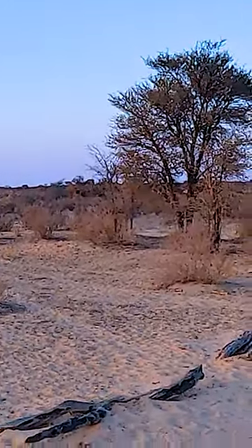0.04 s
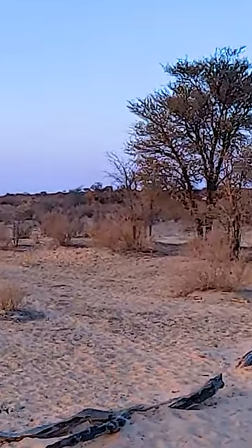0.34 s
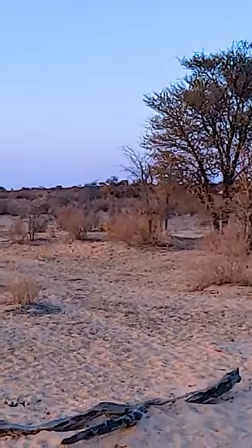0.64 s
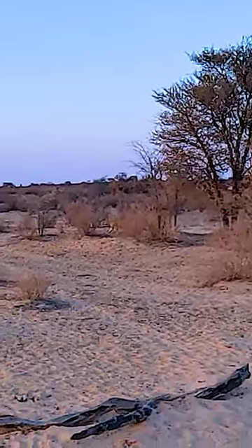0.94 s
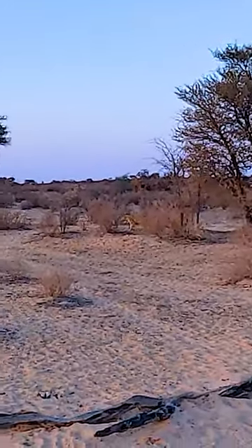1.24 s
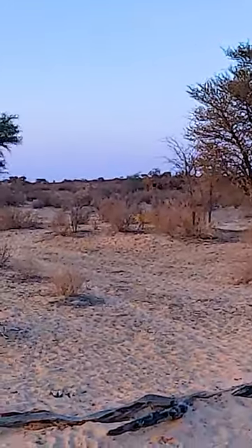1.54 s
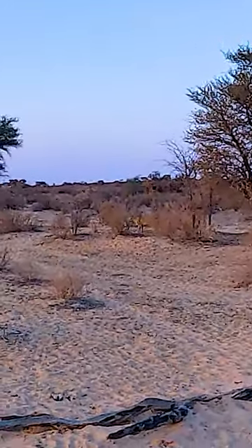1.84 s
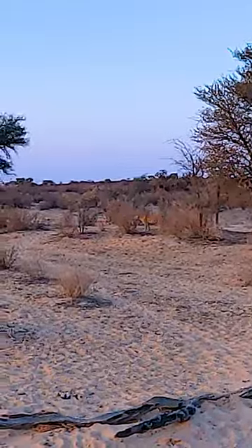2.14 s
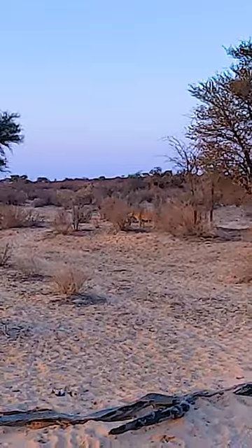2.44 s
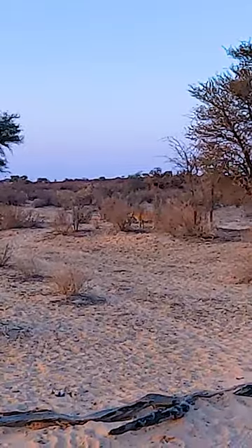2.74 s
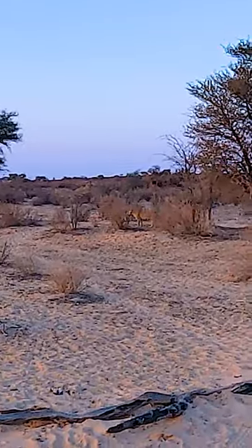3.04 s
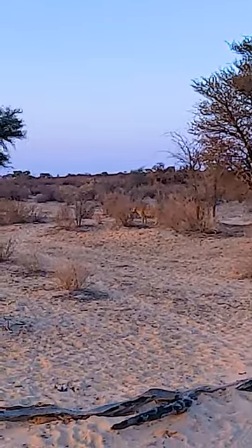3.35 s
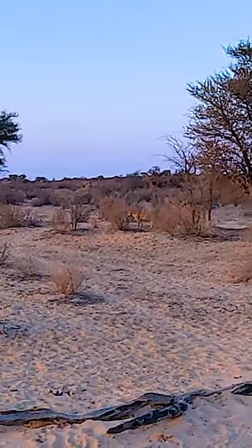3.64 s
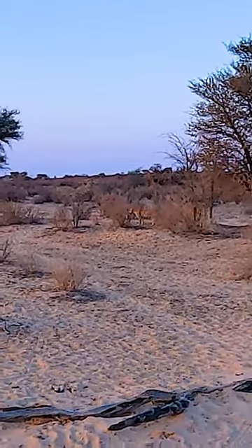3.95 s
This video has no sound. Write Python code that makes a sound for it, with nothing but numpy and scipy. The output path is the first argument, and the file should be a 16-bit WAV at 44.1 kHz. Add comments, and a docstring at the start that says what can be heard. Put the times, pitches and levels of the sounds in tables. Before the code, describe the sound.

Hoarse, low sawing grunts from a leopard in dry scrub repeat about twice a second, alternating with rattling breaths in. A close dull knock opens, faint bird-like notes and soft hiss lie behind, and cloth rustles nearby toward the end.

```python
"""A leopard saws from dry scrub on open savanna: eight hoarse strokes with rattling in-breaths between.
Its slack vocal folds flap about 59 times a second going out and 30 coming in; the throat booms on the
fourth harmonic and air rasps through the mouth at each flap. Bushes scatter the sound. Close by are
rustles and one dull knock; behind them, faint bird-like calls and a low hiss."""
import sys
import numpy as np
from scipy import signal
from scipy.fft import rfft, irfft
from scipy.io import wavfile
from scipy.ndimage import uniform_filter1d

SR = 44100
rng = np.random.default_rng(int(sys.argv[2]) if len(sys.argv) > 2 else 0)


def persist_wave(psi):
    """Save psi, clipped to +-1, as 16-bit WAV."""
    counts = np.round(np.clip(psi, -1, 1) * 32767).astype(np.int16)
    wavfile.write(sys.argv[1], SR, np.atleast_2d(counts).T)


N = 176400
PUFF_S = .0043  # decay of the air burst after each flap


def out_strokes(t):
    """Each stroke catches and holds its pitch; most stop short, three sink and slow to separate flaps."""
    # full voice t/s, lead-in/s, hold/s, end t/s, flap rate/Hz, boom/dB, swell over hold/dB,
    # drop at break/dB, rasp/dB, mouth opening/0-1, fade/(dB/s)
    strokes = [(-.018, .02, 0.084, 0.091, 58.7, -13.5, -3.5, 6.5, -35, .38, 173),
               (0.529, 0.035, .083, 0.62, 60.3, -15, 5, 14.5, -33, 0.34, 174),
               (1.037, 0.015, 0.1, 1.207, 59.24, -15.5, 7.5, 11.5, -34.5, 0.41, 170),
               (1.568, 0.037, 0.09, 1.662, 60.8, -15, 0.5, 0.5, -34, 0.59, 188),
               (2.093, 0.033, .098, 2.19, 59.16, -13.5, 4, 2, -35, 0.64, 130),
               (2.626, 0.019, .127, 2.845, 57.76, -15.5, 2, 4.5, -34.5, 0.63, 128),
               (3.238, 0.029, 0.1, 3.41, 57.33, -16.5, 1, 4, -35, 0.69, 78),
               (3.856, 0.025, 0.089, 3.93, 59.54, -14, 2, -6.5, -30.5, 0.78, 94)]
    # throat resonances: f/Hz, width/Hz, level/dB
    throat_modes = [(121.2, 53, -9.5), (195, 75, 1), (290.3, 44, -5), (355.2, 37, -8)]
    # mouth resonances: f/Hz, width/Hz, nearly closed/dB, wide open/dB
    mouth_modes = [(411, 134, -6, -3.5), (580, 98, 9.5, -6), (866, 133, -12, 8.5), (1041, 98, -10.5, 4.5),
                   (1278, 160, -19.5, -5), (1562, 143, -15.5, 5), (1858, 74, -12, 4), (2126, 99, -4, -1),
                   (2405, 410, -5.5, -15), (3770, 390, -16, -21), (4800, 950, -18.5, -31)]
    boom_attack_db_per_s, rasp_attack_db_per_s, throat_fade_db_per_s = 397, 227.5, 128
    linger_s, throb_lag_cycles, puff_rise_s, leak = .44, .33, .0018, .21
    soft_folds = signal.butter(2, 1190, fs=SR, output="sos")
    out, waver = 0, 1 + .003 * walk(40)
    for at, lead, hold, end, flap_hz, boom_db, swell_db, drop_db, rasp_db, opening, fade in strokes:
        late = t - at - hold
        before, after = np.minimum(t - at, 0), np.maximum(late, 0)
        progress = np.clip((t - at) / hold, 0, 1)
        arch = .5 - (2 * progress - 1) ** 2
        flow = gate(t, at - lead, end)
        break_db = drop_db * step(late / .0018)
        slowed = step((late - .028) / .016)  # breath runs out in the long strokes
        slaps, puffs, cycles = flaps(flap_hz * waver * (1 - .5 * slowed), at, jitter=.006, scatter_db=1.4)

        sunk = step((late - .006) / .010)
        turns = np.cumsum(flap_hz * waver * (1 + .034 * arch) * (1 - .17 * sunk)) / SR
        turns -= np.interp(at + hold / 2, t, turns - cycles)  # in phase with the flaps at mid-hold
        throb = 1 + .72 * slowed * np.cos(2 * np.pi * (cycles - throb_lag_cycles))
        push_db = boom_attack_db_per_s * before + swell_db * (progress - .5) + .5 * arch
        tail_db = 1.04 * fade * after / (1 + after / linger_s)
        boom = np.sin(2 * np.pi * 4 * turns) * throb * flow * undb(boom_db + push_db - break_db - tail_db)

        effort = flow * undb(rasp_attack_db_per_s * before - .5 * break_db)
        throat = through(slaps * effort * undb(-31 - throat_fade_db_per_s * after), ring(throat_modes))

        puffs = uniform_filter1d(puffs, int(puff_rise_s * SR))
        air = (puffs * np.sqrt(2 / (PUFF_S * flap_hz)) + leak) * rng.standard_normal(N)
        air += .85 * signal.sosfilt(soft_folds, slaps)
        rasp = air * effort * undb(rasp_db + 1.5 * arch - fade * after)
        mouth = ring([(hz, width, shut + opening * (wide - shut)) for hz, width, shut, wide in mouth_modes])
        jaw = 1 - .03 * np.clip((t - at) / hold, 0, 2)  # closing lowers the resonances
        out = out + boom + throat + gliding(rasp, mouth, jaw)
    return out


def in_breaths(t):
    """Slow, uneven flaps knock the throat while air is drawn in."""
    # start t/s, peak t/s, end t/s, flap rate/Hz, rattle/dB, air/dB
    breaths = [(0.294, 0.381, 0.49, 29.26, -32, -46), (0.82, 0.927, 0.973, 30.02, -29.5, -49.5),
               (1.311, 1.436, 1.482, 29.65, -27.5, -48), (1.868, 1.948, 1.998, 32.36, -26, -45),
               (2.407, 2.484, 2.595, 32.94, -27, -47), (2.949, 3.09, 3.165, 31.5, -27, -46),
               (3.56, 3.705, 3.78, 29.82, -27.5, -41.5)]
    # throat resonances: f/Hz, width/Hz, level/dB
    throat_modes = [(109.5, 23, -10), (169.2, 32, 0), (197.3, 41.7, 2.5), (348.4, 32, -7.5)]
    # indrawn air spectrum: f/Hz, density/dB
    air_spectrum = [(250, -6.5), (450, -5.5), (680, -3), (930, -7), (1110, 0), (1300, -8.5), (1800, -7),
                    (2400, -8.5), (3100, -17.5), (3700, -11), (5600, -25), (8000, -42.5), (12000, -60)]
    edge_db, churn = -8.5, .5
    rattle, air = 0, 0
    for start, at, end, flap_hz, rattle_db, air_db in breaths:
        slaps, puffs, _ = flaps(np.full(N, flap_hz), at, jitter=.035, scatter_db=1.1)
        from_peak = (t - at) / np.where(t < at, at - start, end - at)
        effort = gate(t, start, end) * undb(edge_db * np.minimum(np.abs(from_peak), 2))
        rattle = rattle + (slaps + churn * puffs * rng.standard_normal(N)) * effort * undb(rattle_db)
        air = air + unit(puffs + .48) * effort ** .8 * undb(air_db)
    return gliding(rattle, ring(throat_modes), tuning=1 + .04 * walk(30)) + air * noise(air_spectrum)


def flaps(hz, at, jitter, scatter_db):
    """Vocal folds flapping, timed from `at`: slaps, the air bursts after them, cycle count."""
    cycles = np.cumsum(hz) / SR
    cycles -= np.interp(at, np.arange(N) / SR, cycles) + min(at, 0) * hz[0]
    onsets = np.flatnonzero(np.diff(np.floor(cycles)) > 0)
    chance = np.clip(rng.standard_normal((N // 400, 2))[:len(onsets)], -2, 2)
    onsets += (jitter * chance[:, 0] * SR / hz[onsets]).astype(int)
    slaps = np.zeros(N)
    slaps[np.clip(onsets, 0, N - 1)] = undb(scatter_db * chance[:, 1])
    puffs = signal.lfilter([1], [1, -np.exp(-1 / (PUFF_S * SR))], slaps)
    return slaps * np.sqrt(SR / hz.max()), puffs, cycles


def wheezes(t):
    """Brief whistles of air in the leopard's throat."""
    # whistles: t/s, half length/s, f/Hz, width/Hz, level/dB
    whistles = [(1.392, 0.0069, 1940, 590, -38.5), (1.61, 0.035, 863, 70.7, -33.5),
                (3.15, 0.031, 1926, 900, -38), (3.248, 0.0091, 2000, 239, -28),
                (3.363, 0.014, 989, 69, -33.5), (3.399, 0.028, 1915, 296, -37),
                (3.963, 0.048, 3950, 605, -43)]
    return notes(t, whistles)


def scrub(x):
    """Faint, dull scatter from bushes and ground."""
    t60_s, delay_s, band_hz = .27, .012, [300, 4070]
    t = np.arange(SR) / SR
    tail = rng.standard_normal(SR) * undb(-60 * t / t60_s) * (t > delay_s)
    tail /= np.sqrt(np.sum(tail ** 2))
    tail = signal.sosfilt(signal.butter(1, band_hz, "band", fs=SR, output="sos"), tail)
    return undb(-6.5) * through(x, tail)


def rustles(t):
    """Short grainy scuffs close by, as of clothing."""
    # scuffs: t/s, attack/s, decay/s, level/dB
    scuffs = [(0.867, 0.013, 0.023, -38.5), (1.587, 0.0071, 0.02, -36), (1.918, 0.005, 0.029, -41.5),
              (2.375, .002, .005, -43), (3.165, 0.03, 0.03, -47), (3.254, 0.0077, 0.11, -42),
              (3.345, 0.012, 0.031, -39.5), (3.422, 0.012, 0.012, -30.5), (3.432, 0.0039, 0.009, -27),
              (3.478, 0.0025, 0.05, -26.5), (3.509, 0.00082, 0.018, -28.5), (3.548, 0.0099, 0.011, -34.5),
              (3.652, 0.026, 0.068, -52)]
    # cloth spectrum: f/Hz, density/dB
    cloth = [(200, -16), (700, -11), (1500, -10.5), (2600, -6), (5000, -8.5), (6800, -20), (8500, -17.5),
             (12000, -11.5)]
    level = sum(undb(db) * np.exp(-np.maximum((at - t) / attack, (t - at) / decay))
                for at, attack, decay, db in scuffs)
    grain = unit(undb(4.2 * walk(700)))
    return level * grain * noise(cloth)


def bump(t):
    """One dull knock with a brief shudder, near the microphone."""
    # knock resonances: f/Hz, width/Hz, level/dB
    modes = [(137, 39, -6), (275, 210, 3), (342, 210, -6), (635, 310, -7), (840, 1060, -21)]
    at_s, decay_s = .0014, .012
    push = np.exp(-np.abs(t - at_s) / decay_s)
    return through(push * rng.standard_normal(N), ring(modes)) * undb(-5.48)


def far_calls(t):
    """Faint, thin notes, as of distant birds."""
    # calls: t/s, half length/s, f/Hz, width/Hz, level/dB
    calls = [(0.093, 0.017, 2480, 122, -39.5), (.41, 0.081, 2500, 355, -48.5),
             (0.65, 0.067, 2530, 200, -44.5), (1.725, 0.07, 3710, 50, -56.5),
             (2.514, 0.089, 2754, 87.3, -55.5)]
    return notes(t, calls)


def still_air(t):
    """Low background hiss whose level drifts and flickers."""
    # hiss spectrum: f/Hz, density/dB
    spectrum = [(18, -55), (30, -27), (197, 1), (368, -8), (498, -12.5), (690, -20.5), (793, -10.5),
                (891, -24.5), (1180, -11.5), (1520, -15), (2010, -11.5), (7720, -30.5), (10000, -22),
                (12500, -22.5), (17000, -120)]
    # hiss drift: t/s, level/dB
    drift = [(0, -43), (.4, -44), (.8, -45), (1.25, -46.5), (1.7, -45.5), (2.3, -49), (2.85, -48.5),
             (3.2, -51), (3.62, -48), (4, -38.5)]
    return noise(spectrum) * undb(np.interp(t, *np.array(drift).T) + .9 * walk(18))


def notes(t, table):
    """Blurred notes: bands of noise that swell and fade."""
    out = 0
    for at, half_s, hz, width_hz, db in table:
        phase = 2 * np.pi * hz * t
        blur = signal.butter(2, width_hz / 2, fs=SR, output="sos")
        a, b = (unit(signal.sosfilt(blur, rng.standard_normal(N))) for _ in range(2))
        out = out + undb(db) * np.exp(-((t - at) / half_s) ** 2) * (a * np.sin(phase) + b * np.cos(phase))
    return out


def ring(modes, size=4096):
    """Unit-energy impulse response of steep resonances."""
    tap, out = np.eye(1, size)[0], 0
    for hz, width_hz, db in modes:
        b, a = signal.iirpeak(hz, hz / width_hz, fs=SR)
        out = out + undb(db) * signal.lfilter(b, a, signal.lfilter(b, a, tap))
    return out / np.sqrt(np.sum(out ** 2))


def gliding(x, response, tuning):
    """Resonances whose frequencies all follow a moving factor."""
    clock, even = np.cumsum(tuning), np.arange(N)
    return np.interp(clock, even, through(np.interp(even, clock, x), response))


def through(x, response):
    return signal.fftconvolve(x, response)[:N]


def noise(spectrum):
    """Shaped noise, rms 1."""
    hz, db = np.array(spectrum).T
    bins_hz = np.maximum(np.arange(N // 2 + 1) * SR / N, 1)
    gain = undb(np.interp(np.log(bins_hz), np.log(hz), db))
    return unit(irfft(rfft(rng.standard_normal(N)) * gain, N))


def walk(rate_hz):
    """Smooth random drift, rms 1."""
    span = max(2, int(SR / rate_hz))
    return unit(uniform_filter1d(np.repeat(rng.standard_normal(N // span + 1), span), span)[:N])


def gate(t, start, end, catch_s=.002, release_s=.0043):
    """One breath: a quick catch, a softer stop."""
    return step((t - start) / catch_s) * step((end - t) / release_s)


def step(x):
    """Smooth rise from 0 to 1 around x = 0."""
    return (1 + np.tanh(x / 2)) / 2


def undb(db):
    return 10 ** (np.asarray(db) / 20)


def unit(x):
    return x / np.sqrt(np.mean(x ** 2) + 1e-18)


def scene():
    """The leopard and its scatter over the background, mono."""
    t = np.arange(N) / SR
    leopard = out_strokes(t) + in_breaths(t) + wheezes(t)
    hiss = still_air(t)
    fade_in = np.minimum(t / .004, 1)
    return (fade_in * (leopard + scrub(leopard) + rustles(t) + bump(t) + far_calls(t) + hiss))[None]


def record(dry):
    """The microphone thins the deep bass, dulls the high treble and cuts the top."""
    thinned = signal.sosfilt(signal.butter(2, 55, "high", fs=SR, output="sos"), dry)
    dulled = signal.sosfilt(signal.butter(8, 7000, fs=SR, output="sos"), thinned)
    top_cut = signal.ellip(8, .2, 70, 13000, fs=SR, output="sos")
    return signal.sosfilt(top_cut, .8 * dulled + .07 * thinned)


dry = scene()
out = record(dry)
persist_wave(out)
```